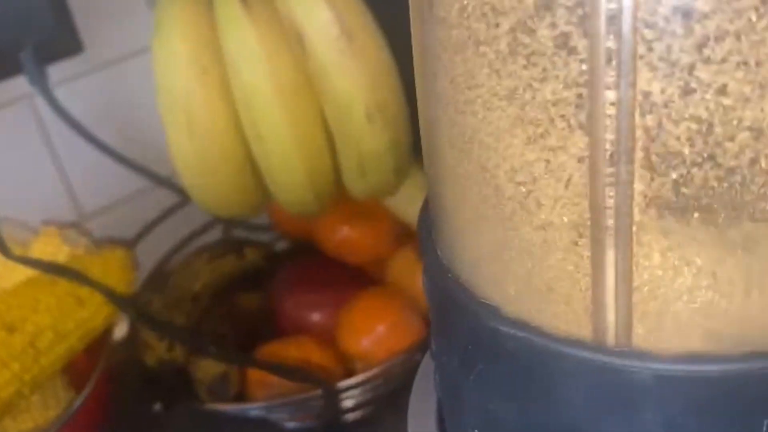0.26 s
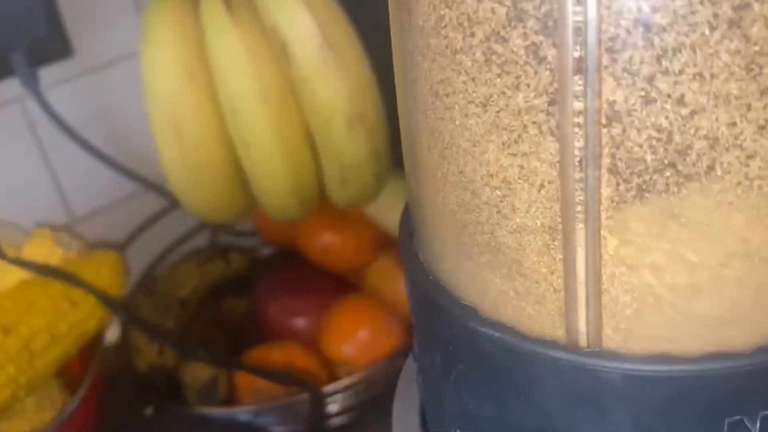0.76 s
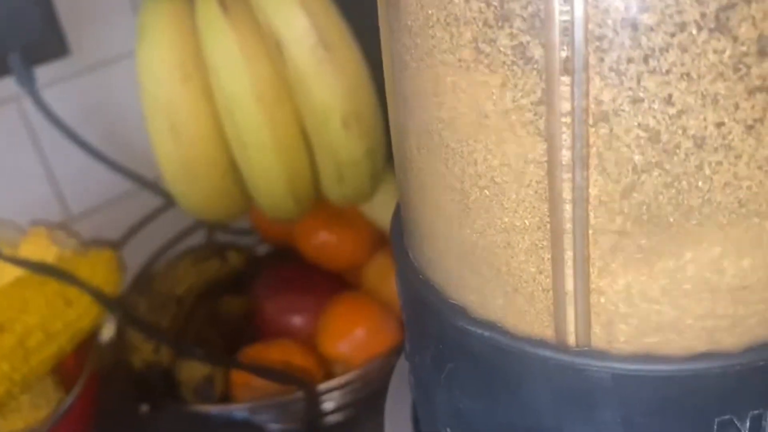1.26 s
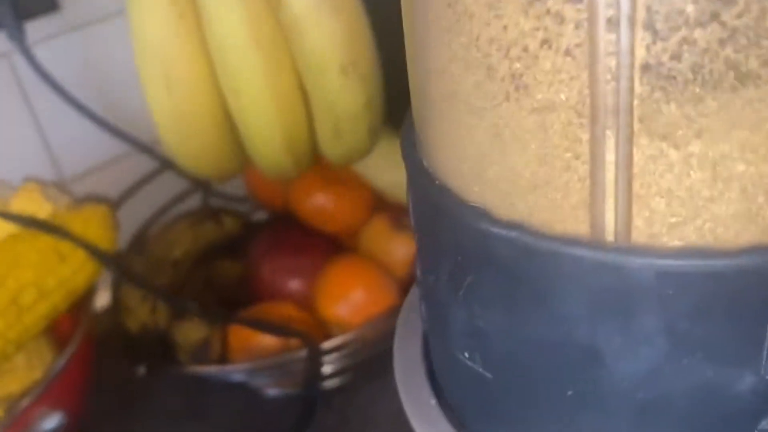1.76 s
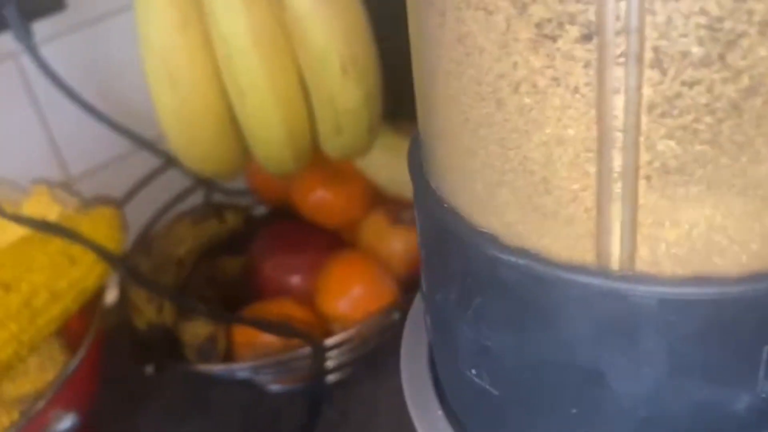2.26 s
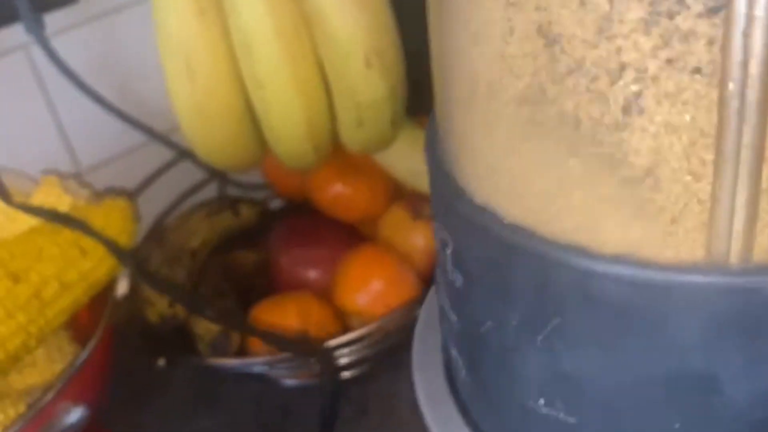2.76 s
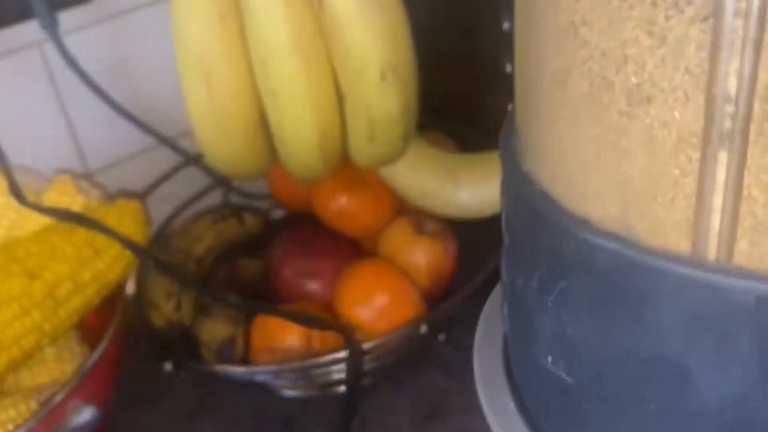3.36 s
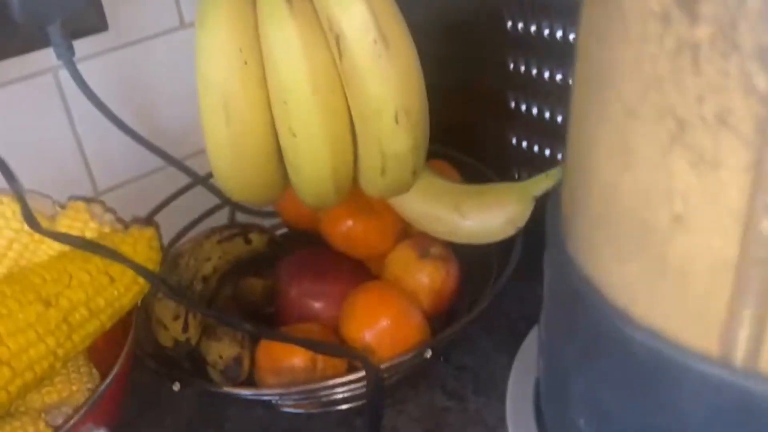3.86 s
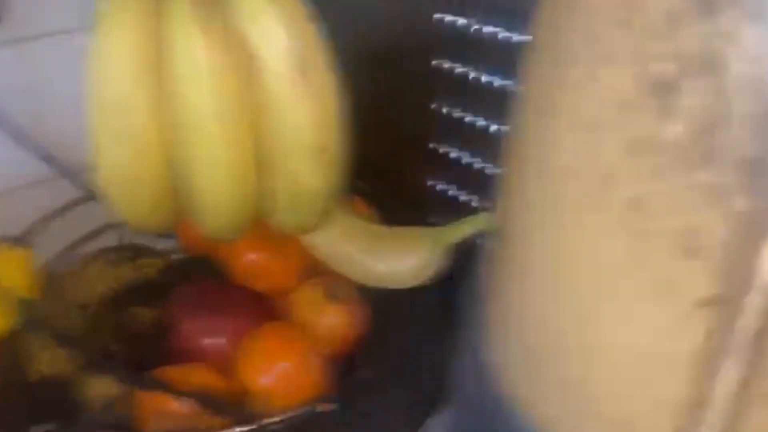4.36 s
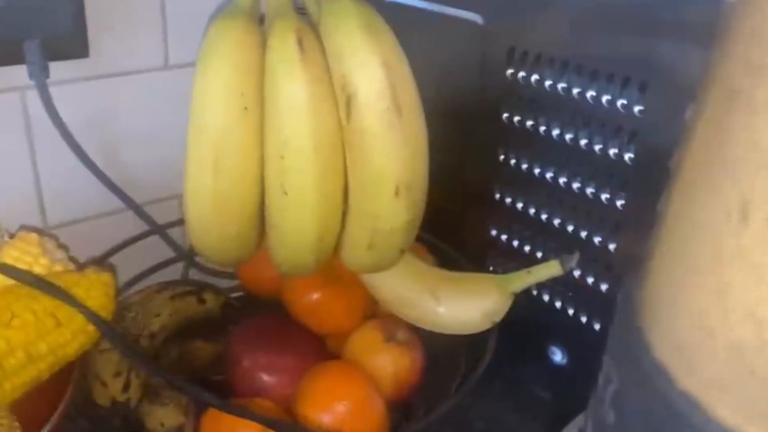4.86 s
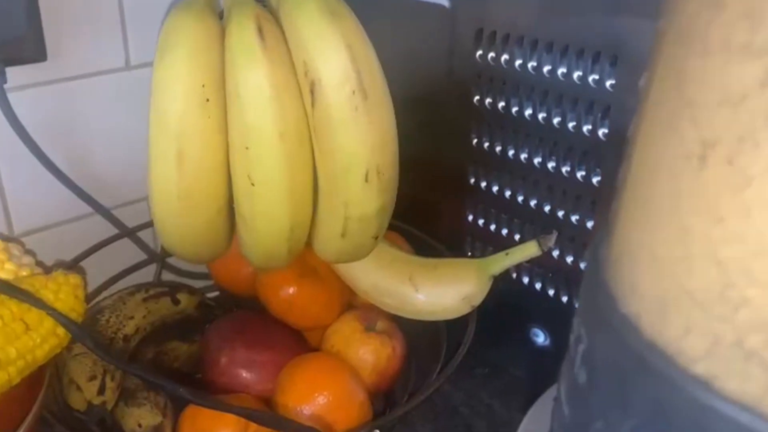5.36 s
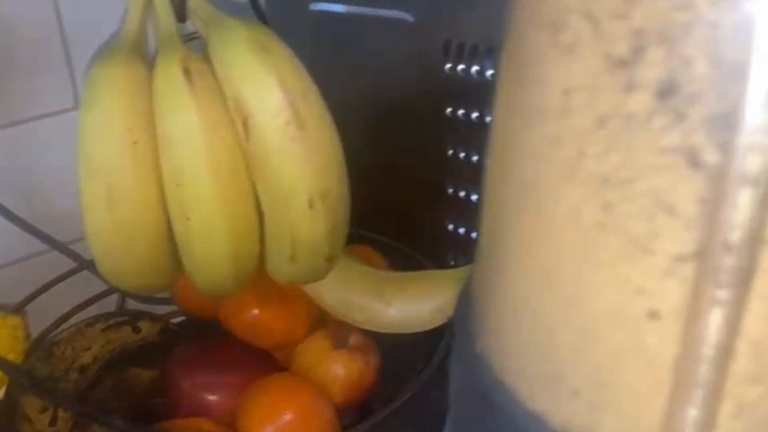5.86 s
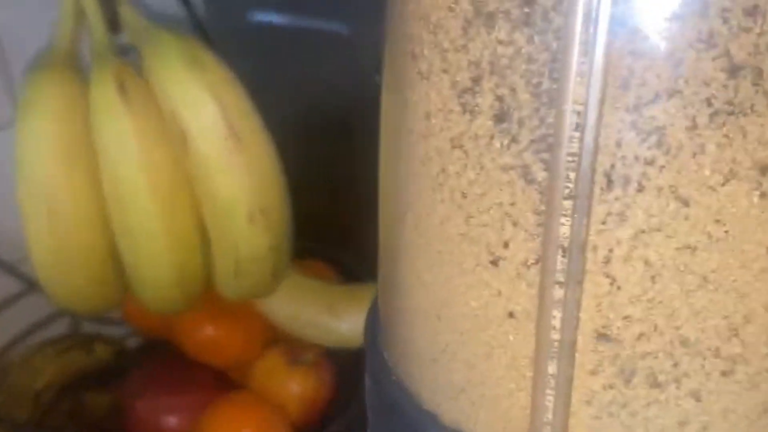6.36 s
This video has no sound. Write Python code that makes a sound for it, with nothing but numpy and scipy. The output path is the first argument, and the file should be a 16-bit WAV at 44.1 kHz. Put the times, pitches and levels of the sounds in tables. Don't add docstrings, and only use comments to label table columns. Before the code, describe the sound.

In a kitchen, very close to a small blender already at full speed: a steady mid-low hum, thin bearing whine, and a dense hiss of dry powder with sharp ticks of hard bits on the plastic cup. After about four seconds it is switched off; the pitch slides down, the base chatters and rocks on the counter, knocks once, and the noise fades while still turning.

```python
import sys
import numpy as np
from scipy import signal
from scipy.fft import rfft, irfft, next_fast_len
from scipy.io import wavfile
from scipy.ndimage import uniform_filter1d

SR = 44100
rng = np.random.default_rng(int(sys.argv[2]) if len(sys.argv) > 2 else 0)


def wav_out(sig):
    wavfile.write(sys.argv[1], SR, np.round(np.clip(np.atleast_2d(sig).T, -1, 1) * 32767).astype(np.int16))


def how_loud(loudness_db):
    steps = np.asarray(loudness_db, float) / 20
    return 10 ** steps


N = 292369
TIME_S = np.arange(N) / SR

# (time [s], speed [turns/s])
SPEED = [(0, 364.6), (.15, 363.9), (.42, 366.9), (1, 365.3), (1.2, 366.8), (1.35, 366), (1.47, 367.8),
         (1.7, 364.8), (1.82, 367.5), (2.1, 364.5), (2.37, 364.8), (2.57, 367.9), (2.72, 366),
         (2.82, 367.6), (3.02, 365.4), (3.3, 367.9), (3.95, 365.8), (4.18, 363.4)]
OFF_S, OFF_TURNS_PER_S = SPEED[-1]
ROCK_HZ = 216.6


def rms_one(x):
    return x / np.sqrt(np.mean(x ** 2) + 1e-20)


def in_time(rows):
    s, *columns = np.transpose(rows)
    return [np.interp(TIME_S, s, c) for c in columns]


def at_hz(points, hz):
    at, *columns = np.transpose(points)
    return [np.interp(np.log(hz + 1), np.log(at), c) for c in columns]


def drift(rate_per_s):
    pole = np.exp(-80 * np.pi * rate_per_s / SR)
    draws = rng.standard_normal(N // 40 + 2002)
    slow = signal.lfilter([1], [1, -2 * pole, pole * pole], draws)[2000:]
    return np.interp(np.arange(N) / 40, np.arange(len(slow)), rms_one(slow))


def band(x, low_hz, high_hz, order):
    return signal.sosfilt(signal.butter(order, [low_hz, high_hz], "band", fs=SR, output="sos"), x)


def bell(hz, centre_hz, width_hz):
    return 1 / (1 + (2 * (hz - centre_hz) / width_hz) ** 2)


def noise(spectrum, patchy_db):
    # (frequency [Hz], likeness [0-1], left lead [rad], left-right [dB])
    ports = [(30, .7, -0.5, 0), (79, 1, -1.5, 0), (170, 0.4, 1, 0.5), (320, 1, -0.3, 1.5), (566, 0, 2, 2.5),
             (925, 0.35, -1.5, 0.5), (1130, 0.4, -2, -1), (1340, 0.96, 0, 0.5), (1770, 0.04, 0.5, 5.5),
             (2170, 0.66, 1.5, 0.5), (2730, 0.55, 0.5, 4), (2890, 0, 4, -2), (3490, 0.2, 3.5, 6),
             (3840, 0.5, 0, -1), (4400, 0, -1.5, 2.5), (6800, 0.5, 1.6, 5.5), (8360, 0.7, 1.5, 3),
             (9080, 0.6, 13, 12)]
    streak_bins, streak_frames = 2, 8
    size = next_fast_len(N)
    hz = np.fft.rfftfreq(size, 1 / SR)
    alike, lead_rad, pan_db = at_hz(ports, hz)
    alike = np.clip(alike, 0, 1)
    mid, side = rfft(rng.standard_normal((2, size)))
    shared = np.sqrt(1 + alike) * mid
    own = np.sqrt(1 - alike) * side
    left = (shared + own) * how_loud(pan_db / 2)
    right = (shared - own) * how_loud(-pan_db / 2) * np.exp(-1j * lead_rad)
    pair = np.array([left, right]) * how_loud(at_hz(spectrum, hz)[0]) * (hz < spectrum[-1][0] * 1.08)
    cells = signal.stft(irfft(pair, size), nperseg=1024)[2]
    streaks = rng.standard_normal(cells.shape[1:])
    for _ in range(2):
        streaks = uniform_filter1d(streaks, streak_bins, axis=0)
        streaks = uniform_filter1d(streaks, streak_frames // 2, axis=1)
    patchy = signal.istft(cells * how_loud(patchy_db * rms_one(streaks)), nperseg=1024)[1][:, :N]
    out = patchy * how_loud(0.7 * drift(3.))
    return out / np.sqrt(np.mean(out.mean(axis=0) ** 2))


def tone(turns, multiple, level_db, pan_db, lead_rad):
    phase = 2 * np.pi * (multiple * turns + rng.random())
    left = how_loud(pan_db / 2) * np.sin(phase + lead_rad)
    right = how_loud(-pan_db / 2) * np.sin(phase)
    return np.sqrt(2) * how_loud(level_db) * np.array([left, right])


def rotation():
    # (time [s], speed above the drag law [%])
    lag = [
        (4.18, 0),
        (4.3, .8),
        (4.45, 1.3),
        (4.75, 1.8),
        (5.05, 1.8),
        (5.25, .8),
        (6.1, .8),
        (6.35, .4),
        (6.63, -.7),
    ]
    drag, drag_growth = .481, .003
    free_s = np.maximum(TIME_S - OFF_S, 0)
    decay = np.exp(-drag * free_s - drag_growth * free_s ** 2)
    return in_time(SPEED)[0] * decay * (1 + in_time(lag)[0] / 100)


def coasting(speed):
    loosen_s, rock_width_hz = 0.18, 44
    free_s = np.maximum(TIME_S - OFF_S, 0)
    down_oct = np.log2(OFF_TURNS_PER_S / speed)
    loose = 1 - np.exp(-(free_s / loosen_s) ** 2)
    return down_oct, loose, bell(speed, ROCK_HZ, rock_width_hz)


def beat(turns, depth):
    return 1 + depth * np.cos(2 * np.pi * turns)


def rumble(speed):
    # (frequency [Hz], density [dB/Hz])
    spectrum = [(25, -10), (45, -12), (70, 3), (110, -1.5), (210, 6), (300, -7), (450, 3), (700, -42)]
    level_db, db_per_oct, rock_db, rock_width_hz = -61, 7, 13.5, 92
    down_oct, _, _ = coasting(speed)
    gain_db = level_db + db_per_oct * down_oct + rock_db * bell(speed, ROCK_HZ, rock_width_hz)
    return how_loud(gain_db) * noise(spectrum, patchy_db=2.)


def vent(speed):
    # (frequency [Hz], density [dB/Hz])
    spectrum = [(2500, -17), (2850, -3.5), (3600, -6), (4000, -24)]
    open_s, rise_s, level_db, db_per_oct = 2.62, .12, -50, -6.5
    down_oct, _, _ = coasting(speed)
    opened = np.clip((TIME_S - open_s) / rise_s, 0, 1)
    air = noise(spectrum, patchy_db=2.5) * [[1], [-1]]
    return opened * how_loud(level_db + db_per_oct * down_oct / 2) * air


def swirl(speed, turns):
    # (frequency [Hz], density [dB/Hz])
    spectrum = [(40, -27), (90, -9), (200, -15), (420, -5.5), (500, -10.5), (620, -10.5), (760, -3.5),
                (1000, -6), (1300, -4.5), (1650, -7.5), (2050, 1.5), (2600, -1.5), (2950, -6), (3200, -11),
                (3550, -10.5), (3800, -9), (4500, -3.5), (5300, -5.5), (6900, -12), (8300, -11.5)]
    level_db, db_per_oct, settle_db = -37.5, -6.5, -1.5
    down_oct, _, _ = coasting(speed)
    gain_db = level_db + db_per_oct * down_oct + settle_db * down_oct ** 3
    return how_loud(gain_db) * beat(turns, 0.11) * noise(spectrum, patchy_db=2.5)


def rattle(speed, turns):
    # (frequency [Hz], density [dB/Hz])
    spectrum = [(40, -16), (70, -13), (200, -25), (360, -0.5), (600, -13), (750, -12.5), (950, 0.5),
                (1550, -18), (2100, -10.5), (2900, -23), (3600, -22), (4100, -17), (4650, 3.5), (5300, -17),
                (5900, -38), (6300, -8.5), (6700, -35), (8300, -27)]
    level_db, loose_db, rock_db, late_db = -60.5, 13, 11, 1
    down_oct, loose, rock = coasting(speed)
    gain_db = level_db + loose_db * loose + rock_db * rock + late_db * down_oct ** 3
    return how_loud(gain_db) * beat(turns, 0.11) * noise(spectrum, patchy_db=2.5)


def knock():
    # (frequency [Hz], level [dB], t60 [s])
    modes = [
        (356, 3, 0.079),
        (940, 3, 0.059),
        (1910, -11, 0.033),
    ]
    at_s, level_db, rise_s = 5.652, -27, 0.0053
    t = np.maximum(TIME_S - at_s, 0)
    ring = sum(how_loud(level_db + db - 60 * t / t60) * np.sin(2 * np.pi * hz * t) for hz, db, t60 in modes)
    return ring * (1 - np.exp(-t / rise_s))


def surges(speed):
    # (start [s], length [s], level [dB])
    slides = [(0.008, 0.16, -36), (.21, 0.34, -40.5), (0.473, .07, -39.5), (.61, 0.16, -40),
              (0.827, 0.074, -42.5), (0.896, 0.037, -37), (1.018, 0.087, -42.5), (1.184, 0.16, -38.5),
              (1.422, 0.018, -43), (1.47, 0.033, -35.5), (1.573, 0.088, -39.5), (1.79, 0.23, -39.5),
              (2.057, 0.035, -37.5), (2.23, 0.1, -40.5), (2.48, 0.2, -39.5), (2.784, 0.027, -38),
              (2.86, 0.031, -38), (2.94, 0.045, -39), (3.12, 0.045, -40), (3.317, 0.14, -39),
              (3.547, 0.28, -42), (4.003, 0.077, -42.5), (4.1, 0.044, -40.5), (4.257, 0.069, -40.5),
              (4.428, 0.08, -42), (4.985, 0.46, -48.5), (5.634, .02, -52), (5.97, .03, -53)]
    floor_db, db_per_oct, settle_db = -44.5, -2, -3
    attack_s, release_s = 0.029, 0.053
    down_oct, _, _ = coasting(speed)
    power = how_loud(floor_db + db_per_oct * down_oct + settle_db * down_oct ** 3) ** 2
    for s, length_s, db in slides:
        rise = np.clip((TIME_S - s) / attack_s, 0, 1)
        fall = np.exp(-np.maximum(TIME_S - s - length_s, 0) / release_s)
        power = power + (how_loud(db) * rise * fall) ** 2
    return np.sqrt(power)


def spray(speed, turns):
    sizes = how_loud(0.65 * np.minimum(rng.exponential(1, N), 5)) * rng.standard_normal((2, N))
    hits = rng.random(N) < 9000 * how_loud(2.5 * drift(40.)) / SR
    grains = sizes * hits * beat(turns, 0.19)
    shared = rms_one(band(grains[0], 9160, 10935, order=4))
    below = band(grains[1], 7700, 9600, order=2)
    above = band(grains[1], 10640, 11700, order=4)
    opposed = rms_one(below + how_loud(2.5) * above)
    return surges(speed) * (shared + how_loud(-3.0) * opposed * [[1], [-1]])


def ticks():
    # (time [s], peak [dB])
    strikes = [(0.0358, -28), (0.1383, -7.5), (0.1639, -9.5), (0.2803, -24), (0.3606, -13), (0.497, -12),
               (0.5217, -7), (0.5483, -11), (0.9216, -12), (1.027, -11), (1.041, -12), (1.2507, -15),
               (1.259, -7), (1.4388, -8.5), (1.49, -12), (1.5304, -17), (1.6013, -14), (1.6455, -12),
               (1.791, -12.5), (1.8482, -6.5), (1.87, -9), (2.488, -15), (2.8754, -26), (2.8943, -22),
               (3.641, -9), (3.7199, -20), (4.1395, -12), (4.4554, -9), (5.6444, -13.5), (5.667, -19),
               (5.988, -21)]
    snap_s, snap_db = 2.488, -18
    bursts = np.zeros((2, N))
    i = np.arange(60)
    crack = rng.standard_normal((len(strikes), 2, 60)) * np.exp(-i / 25.0) * np.minimum(i / 13.0, 1)
    for (s, peak_db), shape in zip(strikes, crack):
        at = round(s * SR)
        peak = np.abs(band(shape[0], 7450, 11450, order=2)).max()
        bursts[:, at:at + 60] += how_loud(peak_db) * shape / peak / 2
    wall = band(bursts, 8620, 10950, order=4)
    body = band(bursts, 2300, 6400, order=1)
    mid, side = wall + how_loud(-16) * body
    at = round(snap_s * SR)
    mid[at:at + 2] += how_loud(snap_db) * np.array([1, -1])
    return mid + how_loud(-2.5) * side * [[1], [-1]]


def housing(hz):
    # (centre [Hz], width [Hz], level [dB])
    modes = [(1023, 440, 7.5), (2157, 602, 13.5), (2340, 82, -9), (3370, 970, 6.5), (4607, 490, 18),
             (6330, 170, 10.5), (8450, 100, -2)]
    grid_hz = np.arange(0, SR / 2, 10.)
    power = how_loud(-8.0)
    for centre, width, db in modes:
        power = power + how_loud(db) ** 2 / (1 + (2 * (grid_hz - centre) / width) ** 4)
    return np.sqrt(np.interp(hz, grid_hz, power * (grid_hz < 8300)))


def slip_turns():
    return .0045 * drift(40.)


def skid(speed, turns):
    multiples = [3.55, 4.39, 13.8, 14.54, 15.28, 16.03, 16.56, 17.38, 17.56, 18.19, 15.66, 13.83, 14.6,
                 5.22, 22.32, 23.12, 23.49, 25.34, 26.0, 26.72, 30.73, 32.04, 35.16, 35.55, 28.75, 29.46,
                 27.4, 7.12, 7.83, 32.42, 31.6, 36.0]
    # (middle [s], length [s], level [dB])
    swells = [(4.8, 0.4, -53), (4.73, .3, -59), (4.5, .2, -76), (4.65, 0.22, -64), (4.65, 0.18, -70),
              (4.72, .2, -76), (4.87, 0.22, -57.5), (4.95, 0.19, -54.5), (5.44, 0.7, -60),
              (6.17, 0.64, -63), (4.7, 0.38, -69.5), (5.6, 0.53, -66), (5.8, 0.44, -67.5), (5.6, 0.33, -57),
              (5.4, 0.59, -63), (5.45, 0.4, -60.5), (5.35, .3, -63), (6.15, .4, -66), (5.65, .3, -68),
              (5.7, .4, -67), (2.5, .2, -67), (5.45, .15, -70), (5.65, .2, -59), (6.3, .2, -62),
              (6.3, 0.6, -74), (6, 0.49, -83), (5.8, .3, -74), (6.2, 0.31, -59.5), (6.35, 0.4, -58.5),
              (6.2, 0.38, -87), (6.5, 0.24, -65), (6.4, 0.39, -70)]
    out = np.zeros((2, N))
    off = int(OFF_S * SR)
    t = TIME_S[off:]
    slips = [slip_turns()[off:] for _ in range(4)]
    flickers = [drift(18.0)[off:] for _ in range(5)]
    for i, (k, (s, length_s, db)) in enumerate(zip(multiples, swells)):
        swell = np.exp(-(2 * (t - s) / length_s) ** 2) * housing(k * speed[off:])
        level_db = db + 2.3 * flickers[i % 5]
        out[:, off:] += swell * tone(turns[off:] + slips[i % 4], k, level_db, 4.3, 1.0)
    return out


def whine(speed, turns):
    upper = [3, 4, 5, 6, 7, 8, 9, 10, 10.28, 11.03, 12, 13.17, 14, 14.25, 14.6, 21, 28.75, 32.4, 36.1]
    # (level [dB], left-right [dB], left lead [rad])
    upper_levels = [(-54, -0.5, -1.27), (-55.5, -3.5, -0.4), (-59, 2, -1.2), (-86, -18, -9), (-56, 1, -0.2),
                    (-82, -2, -17.5), (-69, 17, -2.5), (-83, -8, -18), (-58.5, 3, 1.5), (-82, 1, 21),
                    (-69.5, 6, 0.8), (-67, 8, 1.5), (-80, 9, 3.5), (-75, 5, 1), (-61, 5, 2.5),
                    (-86, 20, -5), (-80, 5, 0), (-87, 0, 5), (-65, 12, 3.5)]
    outer_race = [-58.5, -58.5, -66, -65.5, -70, -66.5]
    # (level [dB], one order below [dB], one order above [dB])
    inner_race = [(-87, -73, -89), (-68.5, -75, -77), (-61.5, -81, -57.5), (-67, -64.5, -54.5),
                  (-55, -91, -101), (-81, -84, -88), (-77, -82, -61)]
    inner_per_turn, outer_per_turn = 4.39, 2.61
    shake_hz, shake_width_hz, shake_db = 258, 31, 2
    cage_off_db = -12
    down_oct, loose, _ = coasting(speed)
    orders_db = 0.97 - 8 * loose + shake_db * bell(speed, shake_hz, shake_width_hz)
    bearing_db = -10 + 12 * loose - 5.5 * down_oct - 0.4 * down_oct ** 3
    lines = [(k, db + orders_db, pan_db, lead) for k, (db, pan_db, lead) in zip(upper, upper_levels)]
    for k, db in enumerate(outer_race):
        gain_db = bearing_db if k else orders_db + cage_off_db * loose
        lines.append(((k + 1) * outer_per_turn, db + gain_db, 2., -.5))
    for k, levels in enumerate(inner_race):
        for side, db in zip((0, -1, 1), levels):
            lines.append(((k + 2) * inner_per_turn + side, db + bearing_db, 4.5, 1.2))
    out = 0
    for k, db, pan_db, lead_rad in lines:
        level_db = db + 2.47 * drift(16.7)
        out = out + housing(k * speed) * tone(turns + slip_turns(), k, level_db, pan_db, lead_rad)
    return out


def hum(speed, turns):
    # (time [s], hum [dB], left-right [dB], cup tilt as second order [dB])
    rotor = [(0, -29.5, 8.5, -1), (.2, -29.5, 6.5, 0), (.55, -33, 12.5, 2), (1, -31, 9, 2.5),
             (1.55, -33, 12.5, 0.5), (2, -30, 9, 2.5), (2.4, -30.5, 10.5, 3), (2.76, -36.5, 18, 4.5),
             (2.97, -31, 11.5, 4.5), (3.25, -34, 13, 3), (3.67, -31, 9, 5.5), (3.95, -33, 14, 2.5),
             (4.2, -30.5, 11.5, 1), (4.65, -33, 5, 5.5), (5.15, -32.5, -4.5, 5.5), (5.35, -34, 4, 8),
             (5.6, -39, 1, 9.5), (6.63, -54.5, 9, -11.5)]
    # (centre [Hz], width [Hz], level [dB])
    base = [(212, 12, 3), (278, 4.7, 4), (359, 91, 5), (459, 10, 9), (547, 64, 8.5)]
    # (time [s], length [s], level [dB])
    jolts = [(4.6, 0.033, 2), (4.697, 0.046, 8.5), (4.797, 0.046, 6.5), (4.956, .03, 11), (5.03, 0.054, -5),
             (5.096, 0.018, 14.5), (5.164, 0.029, 10), (5.21, 0.066, -17), (5.278, .05, 6), (5.35, .04, 5),
             (5.46, .04, 1)]
    second_level_db, second_off_db, second_db_per_oct = -38.5, -10, -9
    rocks_per_s, rock_peak_s, rock_swing_db = 15.6, 5.16, 2.5
    down_oct, loose, rock = coasting(speed)
    hum_db, pan_db, tilt_db = in_time(rotor)
    hum_db = hum_db + sum(db * bell(speed, hz, width) for hz, width, db in base)
    second_db = second_level_db + tilt_db + second_off_db * loose + second_db_per_oct * down_oct
    second_db = second_db + sum(db * bell(2 * speed, hz, width) for hz, width, db in base)
    second_db = second_db + sum(db * bell(TIME_S, s, length_s) for s, length_s, db in jolts)
    throb_db = loose - rock
    hop_db = rock_swing_db * rock * np.cos(2 * np.pi * rocks_per_s * (TIME_S - rock_peak_s))
    first_db = hum_db + hop_db - np.abs(pan_db) / 6 + throb_db * drift(13.0)
    second_db = second_db + 1.9 * hop_db + (0.3 + throb_db) * drift(4.0)
    return tone(turns, 1, first_db, pan_db, -1.09) + tone(turns, 2, second_db, 3.0, 0.96)


def scene():
    speed = rotation()
    turns = np.cumsum(speed) / SR
    air = rumble(speed) + vent(speed) + swirl(speed, turns) + rattle(speed, turns)
    impacts = knock() + spray(speed, turns) + ticks()
    motor = skid(speed, turns) + whine(speed, turns) + hum(speed, turns)
    return air + impacts + motor


def band_limit(x):
    return signal.sosfilt(signal.butter(12, 12350, fs=SR, output="sos"), x)


def record(dry):
    mic = signal.sosfilt(signal.butter(2, 30, "high", fs=SR, output="sos"), dry)
    return band_limit(mic)


dry = scene()
out = record(dry)
wav_out(out)
```